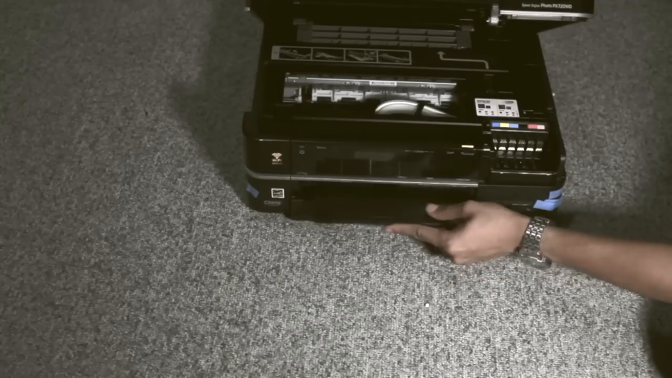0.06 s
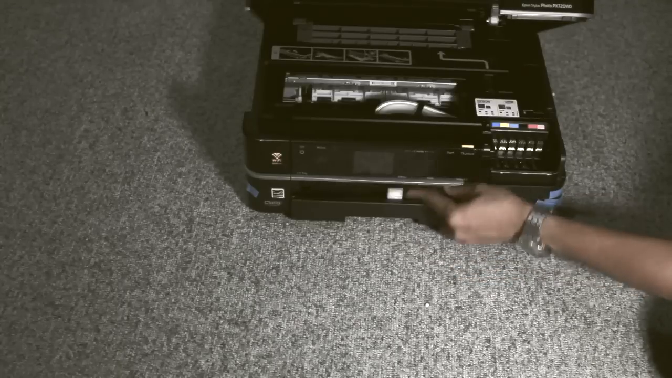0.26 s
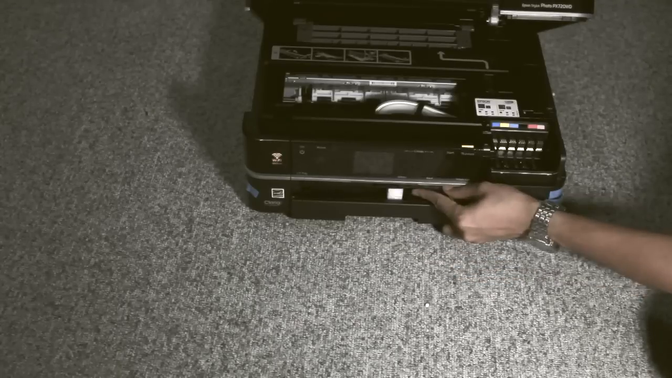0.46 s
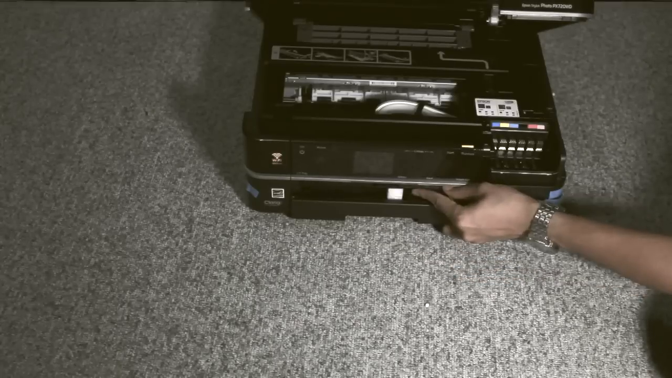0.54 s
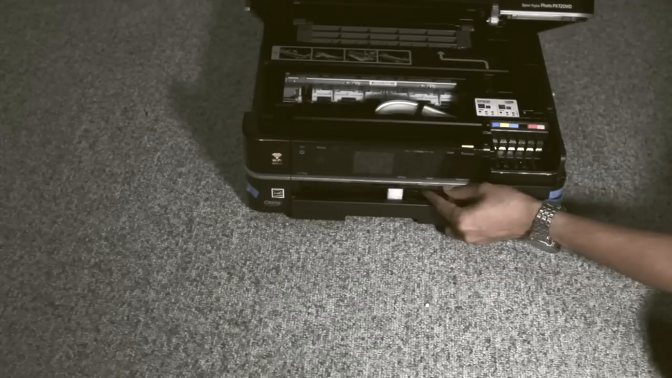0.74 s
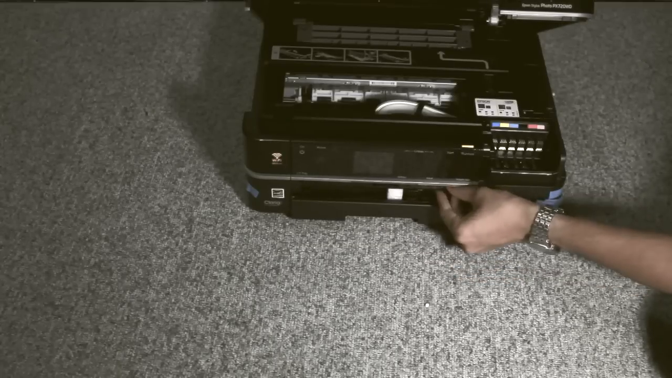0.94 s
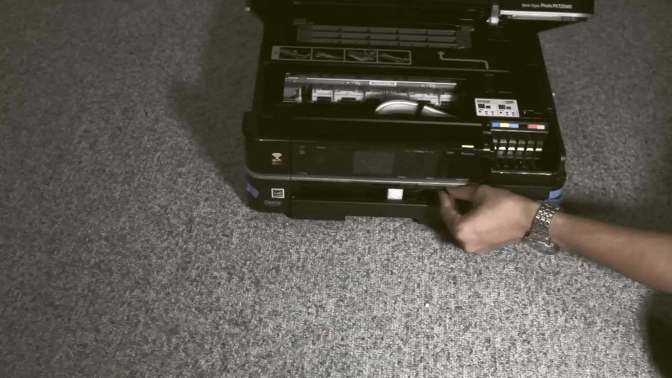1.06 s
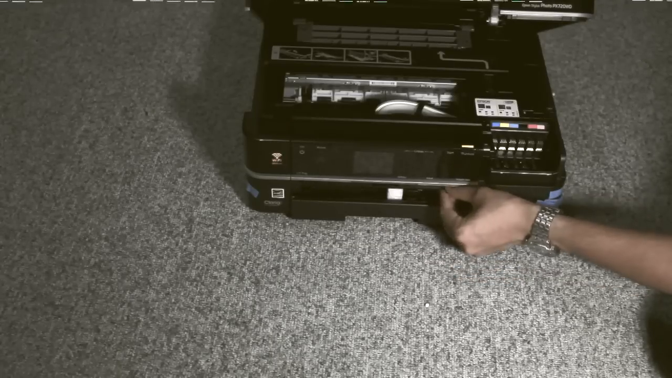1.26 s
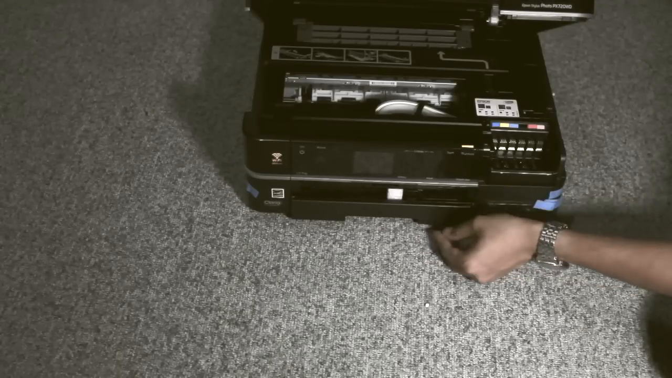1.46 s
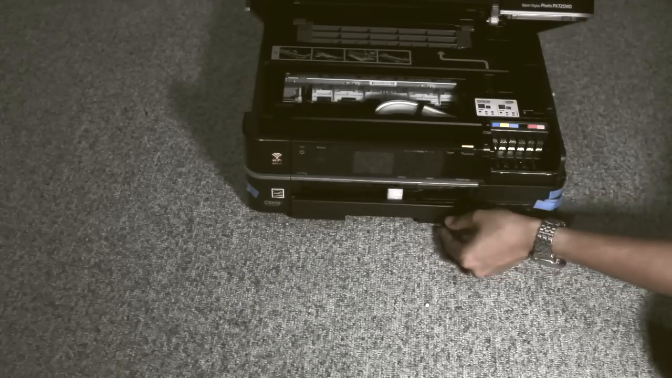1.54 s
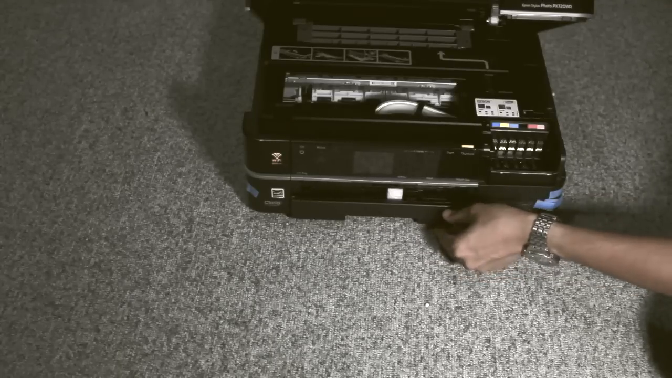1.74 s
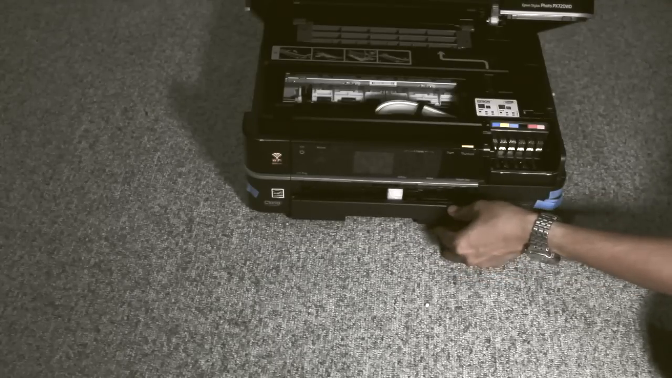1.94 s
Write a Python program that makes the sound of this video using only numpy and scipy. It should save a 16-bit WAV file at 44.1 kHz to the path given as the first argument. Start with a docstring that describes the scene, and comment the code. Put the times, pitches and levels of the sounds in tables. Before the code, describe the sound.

One sharp, hollow clack of a plastic paper tray pushed home, followed by faint finger ticks.

```python
"""A small carpeted room, the stereo microphone close to a printer. A hand pushes the plastic paper tray
home: it snaps past its catch, slides briefly and clacks against its stop, and the hollow housing rings.
Then fingers tick, bump and rub on the plastic. At the start the room still rings from an earlier knock;
faint hiss and hum lie below."""
import sys
import numpy as np
from scipy import signal
from scipy.fft import rfft, irfft
from scipy.io import wavfile

SR = 44100
rng = np.random.default_rng(int(sys.argv[2]) if len(sys.argv) > 2 else 0)


def pcm_store(signal):
    """Save signal as 16-bit PCM."""
    levels = np.round(np.clip(np.atleast_2d(signal), -1, 1) * 32767)
    wavfile.write(sys.argv[1], SR, levels.astype(np.int16).T)


N = 90405
T = np.arange(N) / SR
FFT_SIZE = 2 ** 17
HZ = np.maximum(np.arange(FFT_SIZE // 2 + 1) * SR / FFT_SIZE, 1)


# contacts with the catch: (time [s], level [dB])
CATCH_HITS = [(.2288, -37), (.2301, -34), (.2322, -34), (.2408, -44)]
# modes of catch and tray wall: (frequency [Hz], level [dB], t60 [s])
CATCH_MODES = [(533, -13, .08), (1860, -13.5, 0.022), (2413, -10.5, .022), (3250, -10.5, .02),
               (3750, -7, 0.01), (4470, -4, 0.01), (5166, -7.5, 0.044)]
# spectrum of the snap: (frequency [Hz], level [dB])
CATCH_CRACK = [(150, -16.5), (400, -8.5), (1200, -6), (4500, -3.5), (7500, 0), (10000, -11), (13000, -6.5),
               (16000, -16.5)]
def catch_snap():
    """Close to the microphone, the tray snaps past its catch in four quick contacts."""
    return strike(CATCH_HITS, CATCH_MODES, CATCH_CRACK, crack_db=-6, crack_t60_s=0.034)


# spectra of the slide and the bright scrape: (frequency [Hz], level [dB])
SLIDE_COLOUR = [(200, -12), (800, -3), (3500, -4), (6300, -3), (9000, -18), (16000, -17)]
SCRAPE_COLOUR = [(300, -15), (1500, -15), (4000, 7), (6500, -6), (9500, -18), (12500, -3.5), (16000, -12.5)]
# the scrape's stroke: (time [s], length [s], level [dB])
SCRAPE_STROKE = [(.289, 0.0049, -36.5)]
def tray_slide(start_s=.238, length_s=.065, level_db=-43, slips_per_s=4200):
    """Plastic slides on plastic between catch and stop, and scrapes as the fit tightens."""
    slide = friction([(start_s, length_s, level_db)], slips_per_s, SLIDE_COLOUR)
    scrape = friction(SCRAPE_STROKE, slips_per_s, SCRAPE_COLOUR)
    return in_room(slide + scrape)


# contacts with the stop: (time [s], level [dB])
STOP_HITS = [(.3021, -34), (.3035, -22), (.3074, -23), (.3093, -23), (.3108, -27), (.3143, -32),
             (.319, -35)]
# modes of tray and housing: (frequency [Hz], level [dB], t60 [s])
STOP_MODES = [(245, -18, .05), (342.5, -18, 0.042), (518.4, -17.5, 0.16), (613.4, -13, .07),
              (788.2, -20, 0.086), (877, -20.5, 0.13), (979, -20.5, .06), (1071.7, -16.5, 0.026),
              (1902, -12.5, .05), (3087, -5.5, .03), (3450, -20.5, 0.06), (3550, -16.5, 0.12),
              (3783, -14, .03), (4350, -13, 0.046)]
# spectrum of the clack: (frequency [Hz], level [dB])
STOP_CRACK = [(150, -8), (240, 0.5), (500, 2), (1200, 1), (2300, 3), (3800, 4), (7500, 0.5), (10000, -6.5),
              (12500, 0), (16000, -7.5)]
def stop_clack():
    """The tray meets its stop, corner after corner, and the hollow housing rings."""
    return strike(STOP_HITS, STOP_MODES, STOP_CRACK, crack_db=-2.5, crack_t60_s=.02)


# width of the direct sound at the microphone: (frequency [Hz], side minus mid [dB])
DIRECT_SIDE = [(200, -18), (1000, -11.5), (2500, -16.5), (5000, -5), (12000, -11)]
def strike(hits, modes, crack_colour, crack_db, crack_t60_s):
    """Each contact gives a crack of its own and feeds the modes of the part."""
    count = N // 8
    cracks, rings = 0, 0
    for hit in hits:
        burst = widen(crack(crack_t60_s), DIRECT_SIDE)[:, :count]
        cracks += in_room(convolve(impulses([hit]), burst))
    force = impulses(hits)
    for hz, db, t60 in modes:
        # opposite phase shifts left and right give the mode its width
        skew = np.arctan(from_db(at_hz(DIRECT_SIDE, hz))) * rng.choice([-1, 1]) * np.array([[1], [-1]])
        ring = np.sin(2 * np.pi * hz * T[:count] + skew) * decay(t60, count)
        rings += from_db(db) * np.linalg.norm(force) * unit(convolve(force, ring))
    crack_gain = from_db(crack_db) / np.sqrt(np.mean(from_db(at_hz(crack_colour, HZ)) ** 2))
    return crack_gain * colour(cracks, crack_colour) + in_room(rings, send_db=-4.5)


def crack(t60_s, count=8192):
    """Countless short plastic modes: two dying noises with an even spectrum."""
    fade = decay(t60_s, count)
    noise = rng.standard_normal((2, count)) * fade
    for _ in range(3):
        flattened = irfft(np.exp(1j * np.angle(rfft(noise))))
        noise = flattened * np.minimum(1, 10 * fade)
    return np.pad(unit(noise), ((0, 0), (0, N - count)))


def friction(strokes, slips_per_s, spectrum, edge_s=0.0033):
    """Dense tiny slips under strokes that swell, hold and fade."""
    slips = (rng.random((2, N)) < slips_per_s / SR) * rng.standard_normal((2, N))
    grains = colour(convolve(slips, crack(t60_s=0.024)), spectrum)
    envelope = sum(from_db(db) * np.clip(np.minimum(T - start, start + length - T) / edge_s + .5, 0, 1)
                   for start, length, db in strokes)
    return unit(widen(grains, DIRECT_SIDE)) * np.sqrt(N) * envelope


# the hand meets the housing: (time [s], level [dB])
BUMPS = [(.603, -60), (.755, -60), (.978, -65), (1.04, -73.5), (1.563, -61), (1.662, -71.5)]
# spectrum of a bump: (frequency [Hz], level [dB])
BUMP_COLOUR = [(120, -36), (230, 3.5), (600, 4.5), (1100, -4.5), (2200, -13), (16000, -25)]
def hand_bumps(attack_s=0.012):
    """The soft hand draws dull thuds from the housing."""
    thud = crack(t60_s=0.093) * (1 - np.exp(-T / attack_s))
    return convolve(impulses(BUMPS), unit(colour(thud, BUMP_COLOUR)))


# light finger contacts: (time [s], level [dB], centre frequency [Hz])
TICKS = [(0.175, -60.5, 2985), (.2225, -57, 1930), (0.822, -69, 2520), (.828, -65, 3220),
         (1.119, -71.5, 3500), (1.246, -75, 1130), (1.256, -71, 2186), (1.304, -70.5, 3400),
         (1.313, -72, 1750), (1.35, -77, 594.5), (1.463, -71, 3000), (1.5605, -58.5, 2180),
         (1.5613, -63.5, 3840), (1.564, -62, 1385), (1.667, -69, 2160)]
def finger_ticks(below_db_per_octave=-6.5, above_db_per_octave=-10.5, ring_db=-2.5):
    """Fingers tick on plastic: a crack peaking at one pitch, with a hollow ring there."""
    ticks = 0
    for time, db, hz in TICKS:
        hump = [(hz * 2. ** octave, abs(octave) * (below_db_per_octave if octave < 0
                                                   else above_db_per_octave)) for octave in range(-4, 5)]
        click = unit(colour(crack(t60_s=0.069), hump))
        ring = unit(np.sin(2 * np.pi * hz * T) * decay(t60_s=.03))
        ticks += convolve(impulses([(time, db)]), click + from_db(ring_db) * ring)
    return ticks


# finger strokes: (time [s], length [s], level [dB])
RUBS = [(1.28, 0.061, -71.5), (1.342, 0.038, -65), (1.63, 0.05, -74)]
# spectrum of the rubbing: (frequency [Hz], level [dB])
RUB_COLOUR = [(150, 4), (600, 7), (1200, -1.5), (3300, 2), (7000, -10.5), (16000, -21)]
def finger_rubs():
    """Fingers rub on the tray front as the hand changes its grip."""
    return friction(RUBS, slips_per_s=1300, spectrum=RUB_COLOUR, edge_s=0.013)


# spectrum of the knock's tail: (frequency [Hz], level [dB])
KNOCK_COLOUR = [(130, -32.5), (270, 7), (800, 3.5), (1500, -3.5), (3000, -3.5), (5800, -14), (9000, -19.5),
                (16000, -21)]
def earlier_knock(level_db=-54.5):
    """Only the room's fading ring reaches the microphone from a knock just before."""
    tail = colour(room_tail(), KNOCK_COLOUR)
    return from_db(level_db) * tail / np.std(tail[:, :SR // 20])


# tone of the reverberation: (frequency [Hz], level [dB])
ROOM_COLOUR = [(120, -7), (230, -0.5), (1000, 1.5), (3000, -2), (5800, 3), (9000, -2.5), (15000, -10)]
def in_room(direct, send_db=0, room_db=-6.5, build_s=0.001):
    """Close sound plus reverberation; every spot on the printer excites the room differently."""
    tail = unit(room_tail() * (1 - np.exp(-T / build_s)))
    response = colour(tail, ROOM_COLOUR)[:, :N // 3]
    return direct + from_db(room_db + send_db) * convolve(direct.mean(axis=0), response)


# decay of the room: (frequency [Hz], t60 [s])
ROOM_T60 = [(200, 0.67), (700, .5), (2000, 0.4872), (5000, .37), (8000, 0.3451), (14000, 0.32)]
# its width at the microphone: (frequency [Hz], side minus mid [dB])
ROOM_SIDE = [(200, 1.5), (1000, -6.5), (2500, -7), (5000, -3), (12000, -2.5)]
def room_tail(count=2 ** 15):
    """Diffuse stereo decay, each octave dying at its own rate."""
    centres_hz = 125 * 2. ** np.arange(8)
    white = rfft(rng.standard_normal((2, count)))
    tail = 0
    for hz, pick in zip(centres_hz, np.eye(len(centres_hz))):
        band_gain = np.interp(np.log(HZ[::FFT_SIZE // count]), np.log(centres_hz), pick)
        tail += irfft(white * band_gain) * decay(at_hz(ROOM_T60, hz), count)
    return widen(np.pad(tail, ((0, 0), (0, N - count))), ROOM_SIDE)


# hiss spectrum and hum tones: (frequency [Hz], level [dB])
HISS_COLOUR = [(20, -35), (45, -32), (75, -25.5), (120, -37), (160, -31.5), (230, -31.5), (400, -37.5),
               (700, -39), (1300, -43), (3000, -43), (5500, -41), (8500, -48), (15500, -48.5)]
HUM_TONES = [(49, -85), (74, -93), (199, -92), (602, -95)]
def room_tone(hiss_db=-70):
    """Even hiss and a faint hum behind the printer."""
    width = [(50, -16), (300, -2.5), (5000, -0.5)]   # (frequency [Hz], side minus mid [dB])
    noise = colour(rng.standard_normal((2, N)), HISS_COLOUR)
    hiss = unit(widen(noise, width)) * np.sqrt(N)
    hum = sum(from_db(db) * np.sqrt(2) * np.sin(2 * np.pi * (hz * T + rng.random()))
              for hz, db in HUM_TONES)
    return from_db(hiss_db) * hiss + hum


def impulses(contacts):
    """One impulse per contact; its level is the rms over five milliseconds."""
    force = np.zeros(N)
    for time, db in contacts:
        force[int(time * SR)] += from_db(db) * np.sqrt(SR / 200)
    return force


def from_db(db):
    """Decibels to gain."""
    return 10 ** (np.asarray(db) / 20)


def decay(t60_s, count=N):
    """A fade that falls 60 dB in t60_s."""
    return from_db(-60 * T[:count] / t60_s)


def unit(x):
    """Scale to a mean energy of one per channel."""
    return x / np.sqrt(np.mean(np.sum(x ** 2, axis=-1)) + 1e-20)


def at_hz(points, hz):
    """Read a table on a log-frequency axis."""
    frequencies, values = np.transpose(points)
    return np.interp(np.log(hz), np.log(frequencies), values)


def colour(x, points):
    """Causal (minimum-phase) filter with the given dB curve."""
    cepstrum = irfft(np.log(from_db(at_hz(points, HZ))))
    cepstrum[1:FFT_SIZE // 2] *= 2
    cepstrum[FFT_SIZE // 2 + 1:] = 0
    return irfft(rfft(x, FFT_SIZE) * np.exp(rfft(cepstrum)))[..., :N]


def convolve(x, response):
    """Play a signal through a stereo response."""
    return signal.fftconvolve(np.atleast_2d(x), response, axes=-1)[:, :N]


def widen(pair, side):
    """Left and right from two signals, used as mid and side."""
    return pair[0] + colour(pair[1], side) * np.array([[1], [-1]])


# a low-cut thins the deep bass of the tray, hand and room ring: (frequency [Hz], gain [dB])
LOW_CUT = [(40, -38), (135, -30), (175, -18), (225, 0)]
def scene():
    """At the microphone: tray and hand up close, the room and its steady tone behind."""
    tray = catch_snap() + tray_slide() + stop_clack()
    hand = widen(hand_bumps() + finger_ticks(), DIRECT_SIDE) + finger_rubs()
    return colour(tray + in_room(hand) + earlier_knock(), LOW_CUT) + room_tone()


def record(dry, cutoff_hz=15650):
    """A steep low-pass cuts the top of the microphone signal."""
    return signal.sosfilt(signal.ellip(10, .1, 80, cutoff_hz, fs=SR, output="sos"), dry)


dry = scene()
out = record(dry)
pcm_store(out)
```